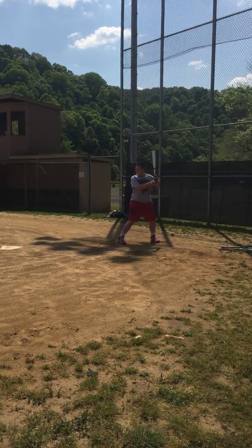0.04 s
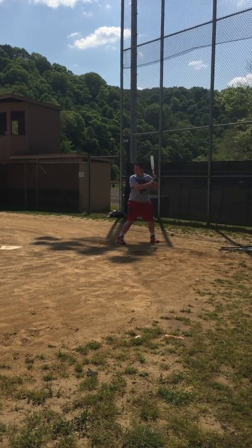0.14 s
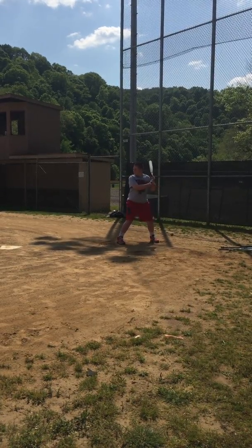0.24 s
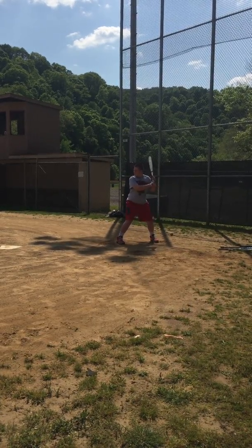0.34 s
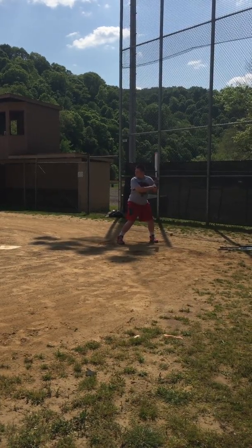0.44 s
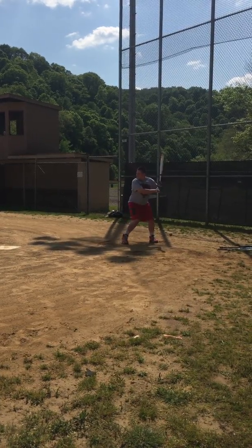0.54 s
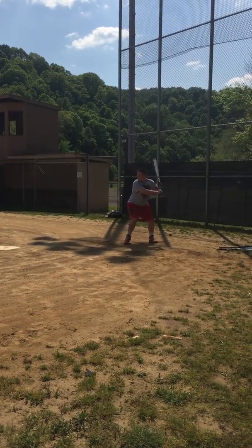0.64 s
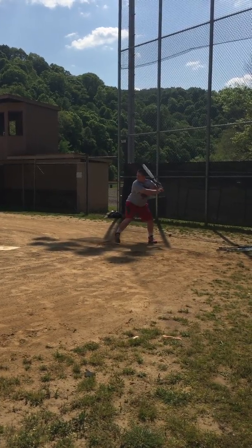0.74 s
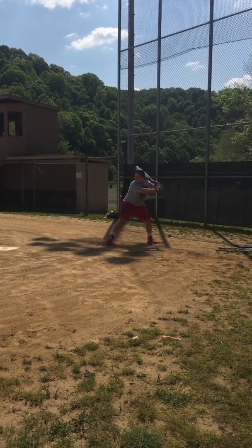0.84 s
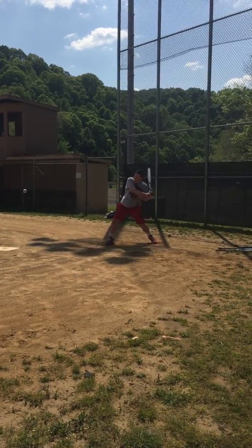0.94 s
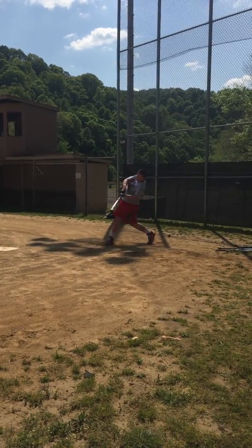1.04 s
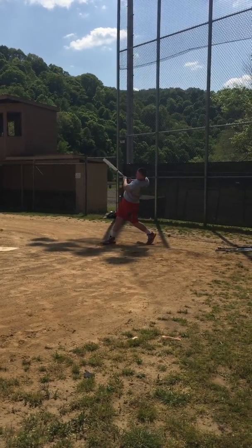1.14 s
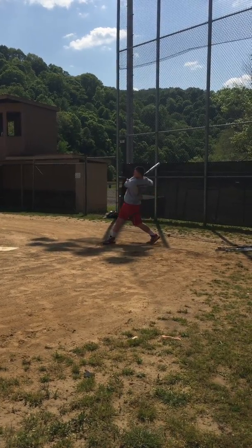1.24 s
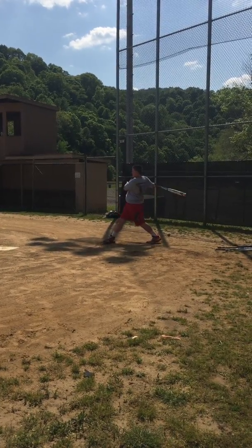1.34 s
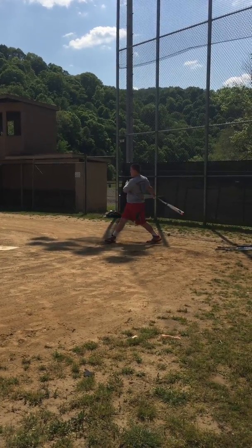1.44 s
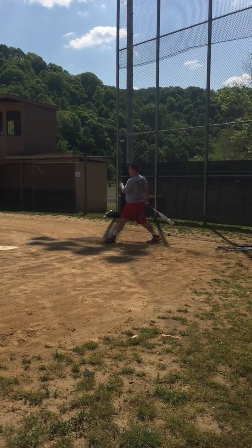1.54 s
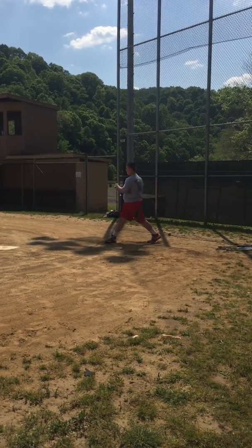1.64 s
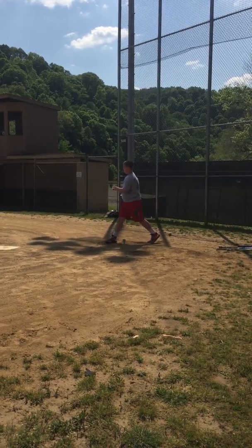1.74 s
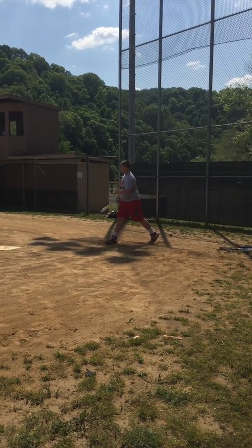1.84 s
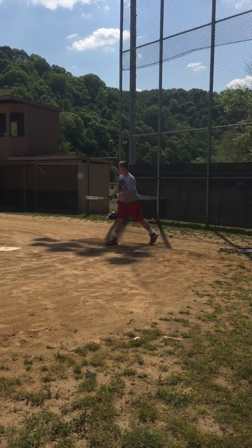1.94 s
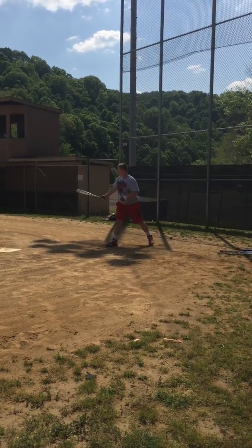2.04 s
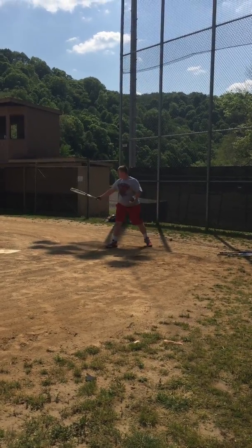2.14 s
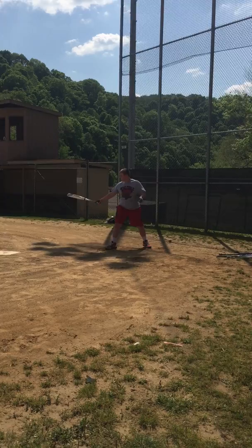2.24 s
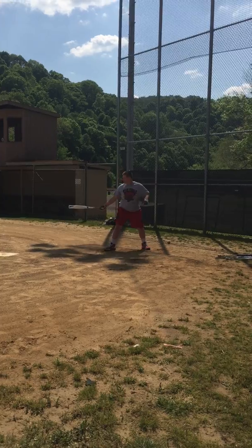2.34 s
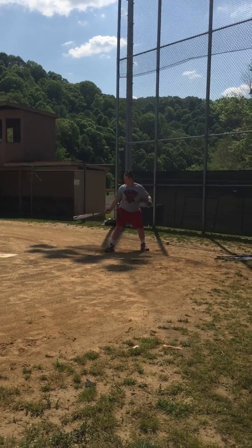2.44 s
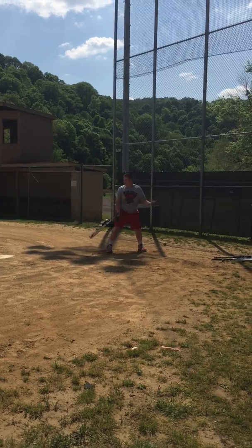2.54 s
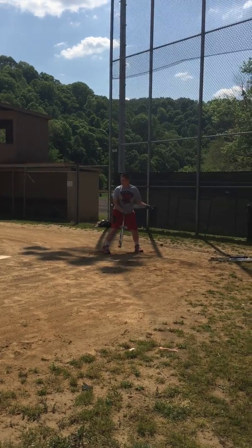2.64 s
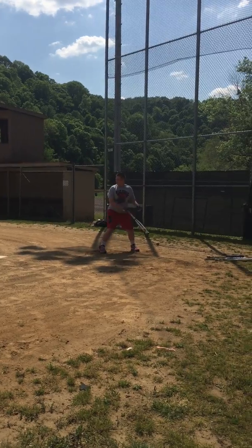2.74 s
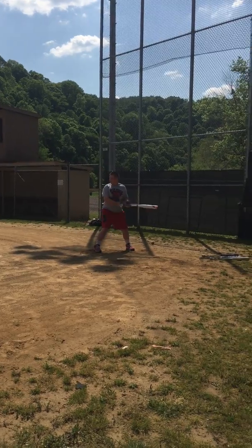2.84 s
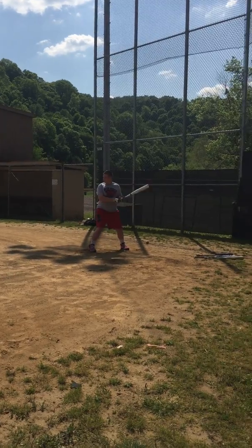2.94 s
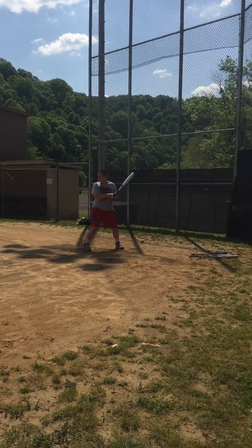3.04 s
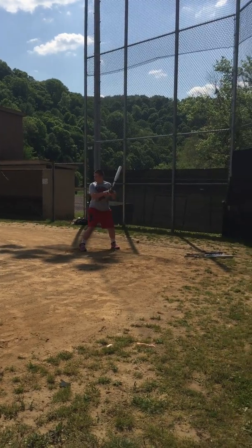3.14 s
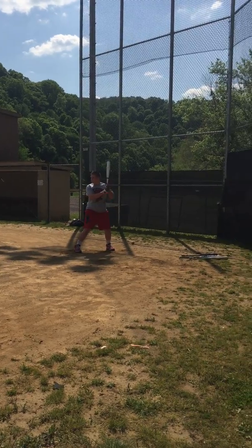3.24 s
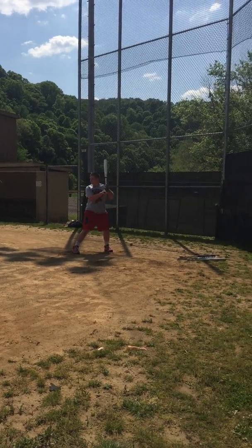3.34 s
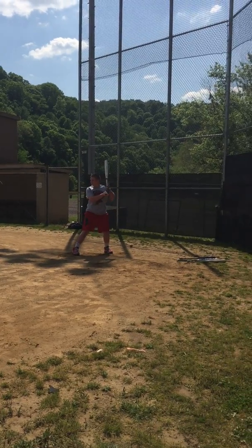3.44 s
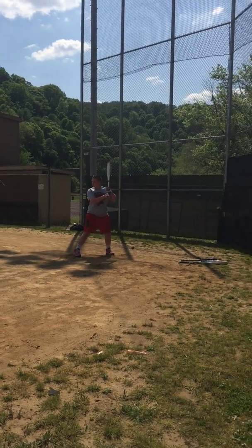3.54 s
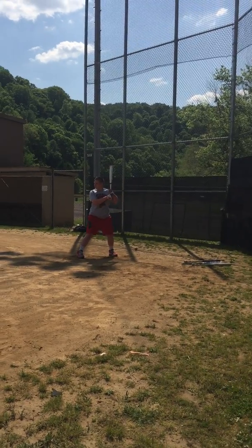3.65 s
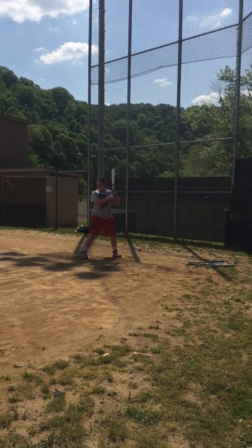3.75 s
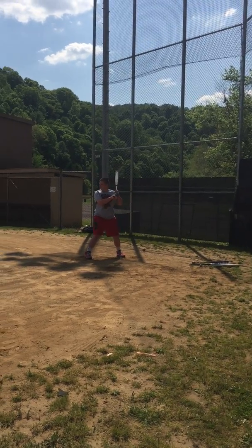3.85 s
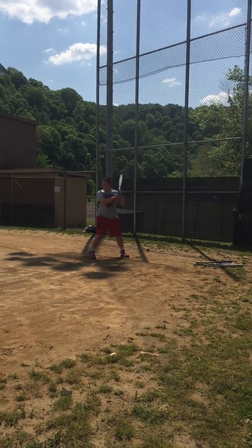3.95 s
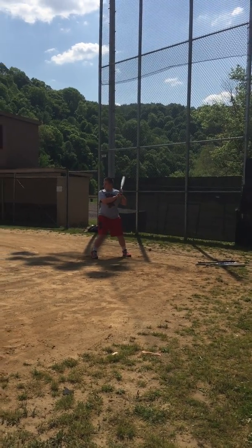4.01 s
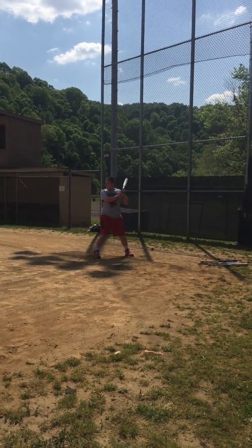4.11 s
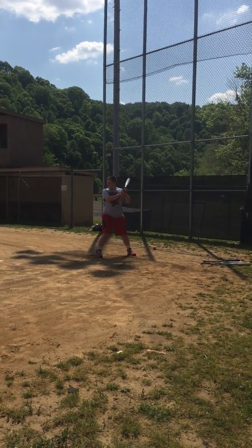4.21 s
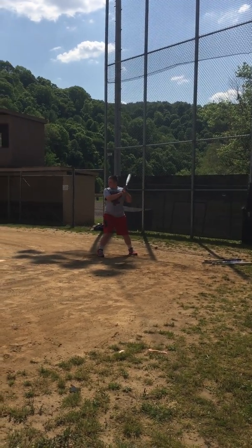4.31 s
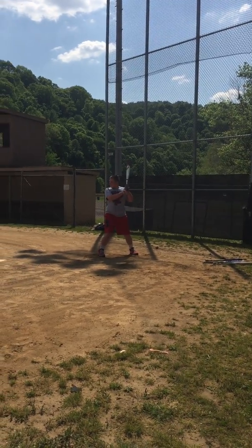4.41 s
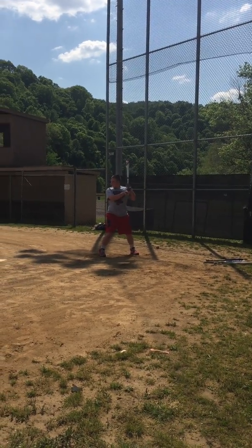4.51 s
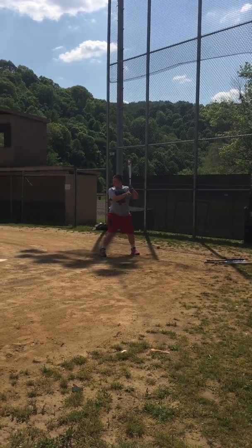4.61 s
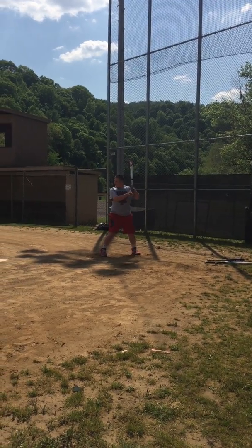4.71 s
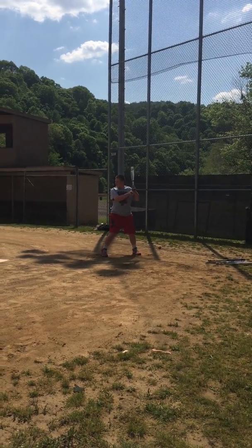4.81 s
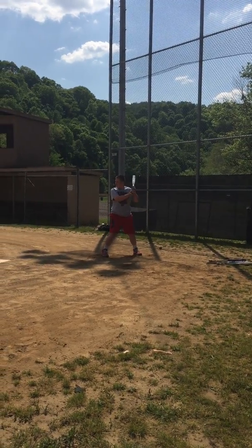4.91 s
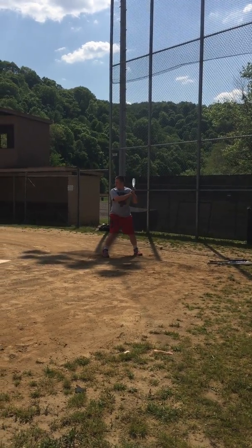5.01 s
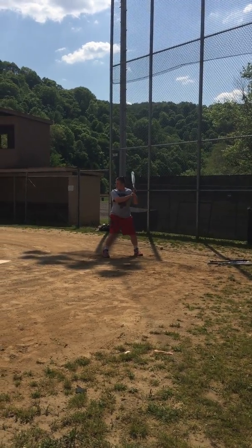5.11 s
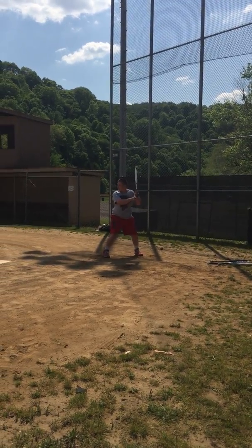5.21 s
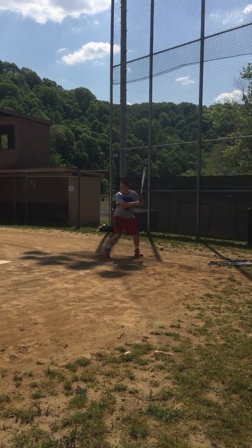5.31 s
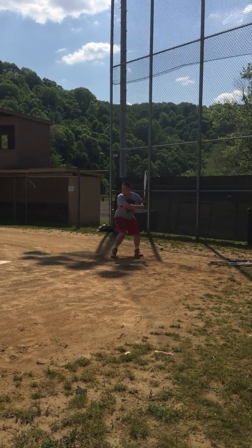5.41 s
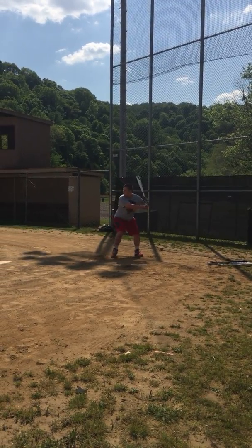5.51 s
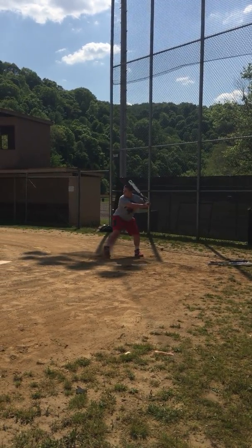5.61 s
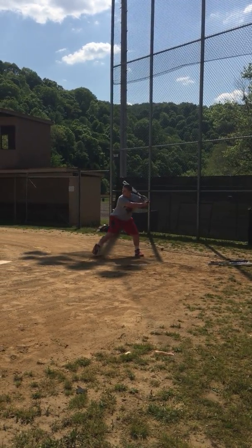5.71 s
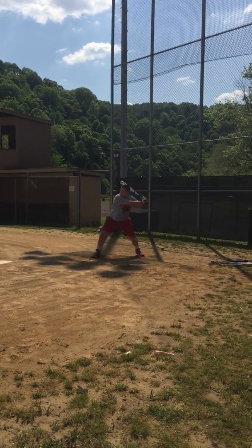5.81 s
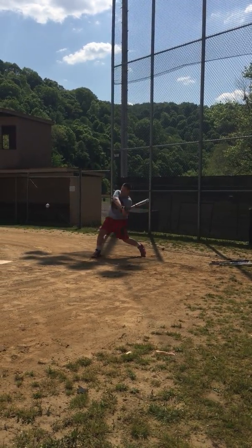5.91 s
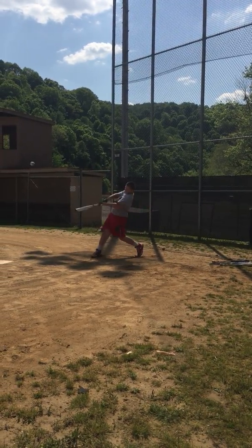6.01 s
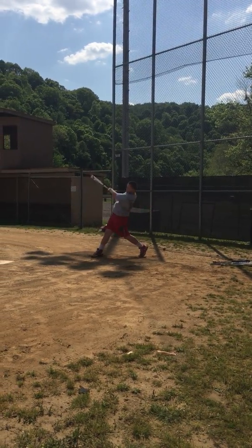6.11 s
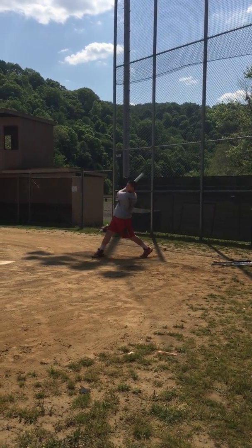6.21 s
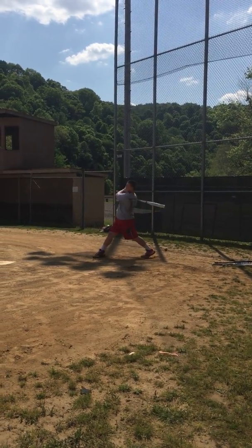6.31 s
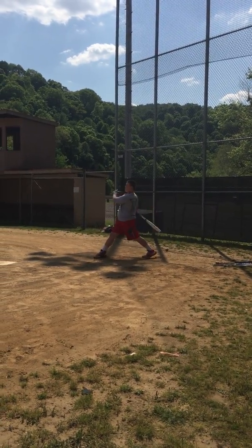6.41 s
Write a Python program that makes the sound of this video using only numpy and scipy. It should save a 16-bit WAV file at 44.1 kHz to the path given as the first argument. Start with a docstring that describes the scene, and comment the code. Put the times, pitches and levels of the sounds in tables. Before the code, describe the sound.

A metal bat hits two pitched balls. The first crack comes early, hard and hollow, with a short pinging ring and echoes from walls, fence and hillside. Between hits there are only faint bird chirps, dull little knocks and scuffs, barely audible ticking, wind bumps and a distant wash. The second crack, close to the end, is stronger and its echo is cut short.

```python
"""Metal bat on an open ball field.

A metal bat strikes two pitched balls: each crack is coloured noise, slapped back by walls, field and hill.
The barrel rings on as beating tones and fuzzy lines, bent by the swing. Dull knocks are damped resonances, scuffs
and faint hiss noise puffs, small birds gliding whistles. A faint double tick rings tiny modes. Shaped noise makes
the wind on the microphone and a distant wash; wavering sines make a far machine's hum."""
import sys
import numpy as np
from scipy import signal
from scipy.io import wavfile
from scipy.ndimage import uniform_filter1d, map_coordinates

SR = 44100
rng = np.random.default_rng(int(sys.argv[2]) if len(sys.argv) > 2 else 0)


def wrap_up_sound(samples):
    """Save the sound to the file named by the first command line argument, as 16-bit audio."""
    columns = np.atleast_2d(samples).T
    # keep every value between -1 and 1, then stretch to whole-number steps
    tamed = np.clip(columns, -1, 1)
    steps = np.round(tamed * 32767).astype(np.int16)
    wavfile.write(sys.argv[1], SR, steps)


N = 285106

# Blows. Each row: start in seconds, level in dB, low push in dB, scatter in dB.
HITS = [(1.2059, -8.5, -24, -4.5), (6.1715, -1.5, -26, -12)]
# Colour, one list per hit. Each row: frequency in Hz, relative level in dB.
CRACK_COLOURS = [
    [(88, -40.5), (150, -10.5), (589, -12.5), (1360, 0), (1790, -14.5), (2360, -8.5), (2900, -7),
     (3350, -14.5), (4160, -9), (4760, -16), (5570, -17), (6020, -32.5), (8230, -37.5), (10400, -49.5),
     (11900, -47.5), (16000, -60)],
    [(88, -62), (150, -10.5), (545, -11.5), (1260, 2.5), (1720, -3.5), (2220, 6.5), (2760, -6.5),
     (3770, -2.5), (4410, -7.5), (5250, -9), (5680, -21), (6640, -12), (8230, -28), (9260, -23.5),
     (10400, -40), (11800, -27.5), (16000, -39)],
]
# Slaps from walls and fence. Each row: delay in seconds, level in dB for hit 1, for hit 2,
# treble loss in dB per unit of log2(1 + f / 2 kHz).
SLAPS = [(0.0136, -14.5, -8.5, 1.04), (.0265, -30.5, -20, -0.5), (.038, -27, -40, 2), (0.0582, -28, -18, 4),
         (0.081, -24, -50, 3), (.092, -20, -38, 6), (0.1027, -18.5, -25.5, -1), (0.184, -36.5, -55, 1)]
# Boards and mesh lift the upper middle of the slaps: lift in dB for hit 1, for hit 2.
SLATS_DB = [10, 3.5]
# Decay of the field. Each row: frequency in Hz, t60 in seconds.
FIELD_DECAY = [(150, .3), (500, .6), (1200, .5), (2500, .55), (4000, .55), (6000, .42), (8000, .28),
               (11000, .2), (15000, .15)]
# Echo clouds from fence and tree line. Each row: delay in seconds, spread in seconds, level in dB,
# treble loss in dB per kHz.
CLOUDS = [(.1, 0.027, -13, 1.5), (0.211, 0.064, -25, 3), (.62, .1, -32, 0.5)]
# Colour of the field scatter, one list per hit. Each row: frequency in Hz, relative level in dB.
SCATTER_COLOURS = [
    [(150, -10.5), (300, -4), (600, -5), (1200, -0.5), (1800, -6.5), (2600, -4), (3500, -10), (4500, -10),
     (6000, -17), (8000, -26), (11000, -34.5), (16000, -42)],
    [(150, -6), (300, -0.5), (600, -0.5), (1300, 4), (1800, 3), (2600, -2.5), (3500, 2.5), (4500, -4.5),
     (6000, -8), (8000, -17), (11000, -28), (16000, -40)],
]
# Rms of the first 2000 samples of scatter: level in dB for hit 1, for hit 2.
FIELD_DB = [-37, -34.5]
# Short barrel overtones. Each row: frequency in Hz, level in dB for hit 1, for hit 2, t60 in seconds.
OVERTONES = [(1190, -28, -35, 0.1002), (1330, -37.5, -26.5, .11), (1600, -34.5, -25.5, 0.1382),
             (2965, -33.5, -35, 0.14), (3040, -36, -37, .25), (3560, -35, -19.5, 0.068)]


def cracks():
    """A click and a few ms of scatter take the colour of the blow; walls, field and hill send it back."""
    out, hz, t = np.zeros(N), np.fft.rfftfreq(2048, 1 / SR), np.arange(8000) / SR
    for k, (start_s, level_db, push_db, scatter_db) in enumerate(HITS):
        drive = amp(scatter_db - 60 * t[:900] / 0.025) * rng.standard_normal(900)
        drive[0] = 1
        colour = read(CRACK_COLOURS[k], hz)
        direct = np.convolve(drive, causal(colour))
        scale = amp(level_db) / (2.25 * direct[:300].std())
        add(out, start_s, scale * direct)

        slats = SLATS_DB[k] * np.exp(-(np.log2((hz + 1) / 4400) / 0.55) ** 2)
        slap_drive = drive[:130] * np.hanning(260)[130:]
        for delay_s, *slap_db, loss in SLAPS:
            duller = causal(uniform_filter1d(colour, size=70) + slats - loss * np.log2(1 + hz / 2000))
            add(out, start_s + delay_s, scale * amp(slap_db[k]) * np.convolve(slap_drive, duller))

        field = tail(lambda f, u: -60 * u / read(FIELD_DECAY, f))
        for delay_s, spread_s, db, loss in CLOUDS:  # the air dulls the cloud echoes
            cloud = tail(lambda f, u: -8.7 * ((u - delay_s) / spread_s) ** 2 - loss * f / 1000)
            field = field + amp(db) * cloud
        # few, uneven reflectors
        grain = amp(2.3 * drift(130, size=len(field)) + 3.2 * drift(500, size=len(field)))
        field = signal.fftconvolve(field * grain, causal(read(SCATTER_COLOURS[k], hz)))
        add(out, start_s + 0.004, amp(FIELD_DB[k]) * field / field[:2000].std())

        # the ball's squash pushes the air
        push_t = t[:3000]
        add(out, start_s, amp(push_db - 60 * push_t / 0.06) * np.sin(2 * np.pi * 210 * push_t))
        for f, *tone_db, t60 in OVERTONES:  # echoes make each overtone waver
            waver = 1 + 0.89 * drift(44.91, size=len(t))
            tone = waver * np.sin(2 * np.pi * f * t)
            add(out, start_s + 0.0099, amp(tone_db[k] - 60 * t / t60) * tone)
    return out


# Loud beating ring as its echoes overlap, one list per hit. Each row: time in seconds, peak in dB.
HOOP = [
    [(1.207, -40), (1.211, -20), (1.2165, -20), (1.219, -6), (1.223, -7), (1.228, -21), (1.2325, -13),
     (1.237, -22), (1.24, -19), (1.2445, -34), (1.2545, -20), (1.261, -30), (1.271, -29), (1.278, -45)],
    [(6.172, -30), (6.175, -10), (6.178, -18), (6.1815, -13), (6.184, -26), (6.1865, -10), (6.1915, -8),
     (6.196, -34), (6.1995, -34), (6.2025, -12), (6.2125, -28), (6.2155, -17), (6.2185, -34), (6.231, -13),
     (6.246, -19), (6.255, -22), (6.26, -48)],
]
# Pitch of the loud ring, bent by the swing. Each row, one per hit: start in Hz, end in Hz.
HOOP_HZ = [(2190, 2250), (2200, 2176)]
# Faint ring that the field keeps sending back, one list per hit. Each row: time in seconds, pitch in Hz,
# level in dB, partials in dB.
RING = [
    [(1.27, 2246, -36.5, -14), (1.35, 2330, -47, -14), (1.46, 2230, -50, -17), (1.52, 2253, -57.5, -8.5),
     (1.61, 2270, -59.5, -6.5), (1.7, 2215, -69.5, -11), (1.8, 2376, -56.5, -7), (1.9, 2367, -62, -9.5),
     (2.06, 2340, -67, -9.5), (2.2, 2383, -78, -14)],
    [(6.265, 2210, -36.5, -10), (6.33, 2317, -41.5, -15), (6.375, 2180, -49.5, -11),
     (6.44, 2236, -41, -19.5), (6.464, 2130, -48.5, -14)],
]
# Each row: ratio to the ring's pitch, level in dB, width in Hz.
RING_PARTIALS = [(.54, -3, 130), (1.275, -2, 90), (1.88, -14, 90)]
# Whistle of the swing. One row: start in seconds, length in seconds, start in Hz, end in Hz, level in dB.
SWISH = (1.0, .2, 2250, 2800, -72)


def barrel():
    """Hoop mode: a loud beating tone, then a fuzzy line and its partials bent by the swing; plus the swish."""
    out = np.zeros(N)
    for rows, hz in zip(HOOP, HOOP_HZ):
        s, peak_db = np.transpose(rows)
        u = np.arange(s[0], s[-1], 1 / SR)
        strength = uniform_filter1d(np.interp(u, s, amp(peak_db)), size=70)
        bent_hz = np.linspace(*hz, len(u)) * (1 + 0.007 * drift(70, size=len(u)))
        ends = np.minimum(1, np.minimum(u - s[0], s[-1] - u) / 0.002)
        add(out, s[0], ends * strength * np.sin(2 * np.pi * np.cumsum(bent_hz) / SR))

    for rows in RING:
        s, hz, level_db, partials_db = np.transpose(rows)
        u = np.arange(s[0], s[-1], 1 / SR)
        hz = np.interp(u, s, hz)
        line = evened(resonate(resonate(rng.standard_normal(len(u)), hz, 130), hz, 190))
        for ratio, db, width_hz in RING_PARTIALS:
            fuzz = fuzzy(len(u), ratio * hz, width_hz)
            partial_db = db + np.interp(u, s, partials_db) + 4.5 * drift(14.03, size=len(u))
            line = line + amp(partial_db) * fuzz
        fade_in = np.minimum(1, (u - s[0]) / 0.014)
        add(out, s[0], amp(np.interp(u, s, level_db)) * line * fade_in)

    start_s, length_s, start_hz, end_hz, db = SWISH
    add(out, start_s, amp(db) * wisp(length_s, start_hz, end_hz, width_hz=95, clear=0.45))
    return out


# Dull knocks: the hollow thock of the blows, its slap-backs, and a few stray thumps.
# Each row: start in seconds, level in dB, frequency in Hz, t60 in seconds.
KNOCKS = [(1.2068, -8.5, 1280, 0.023), (1.297, -23, 262, 0.056), (1.3084, -30, 1252, 0.052),
          (1.388, -36.5, 600, 0.017), (2.039, -50, 300, 0.072), (3.55, -61, 570, 0.1),
          (5.971, -41, 200, 0.045), (6.2756, -19.5, 1416, 0.019)]
# Soft noise puffs: short scuffs, and long faint swells of hiss near 2 kHz.
# Each row: start in seconds, length in seconds, centre in Hz, width in Hz, level in dB.
PUFFS = [(0.468, 0.38, 1920, 500, -72.5), (0.682, 0.065, 1430, 303, -68), (0.984, .087, 830, 398, -69),
         (2.026, .05, 2500, 3000, -69.5), (2.651, .2, 2100, 600, -75), (3.35, .061, 1880, 1510, -70),
         (4.102, .64, 1850, 499, -75.5), (5.554, 0.077, 1355, 350, -64), (5.56, 0.056, 3720, 1784, -69),
         (5.921, 0.15, 2060, 449, -69)]


def knocks_and_puffs():
    """Knocks decay as a sine plus noise in one broad resonance; puffs are softly faded band noise."""
    out, t = np.zeros(N), np.arange(6000) / SR
    attack = np.sin(np.pi / 2 * np.minimum(1, t / 0.0011)) ** 2
    for start_s, level_db, hz, t60 in KNOCKS:
        body = np.sin(2 * np.pi * hz * t) + 0.5 * fuzzy(len(t), hz, 0.7 * hz)
        add(out, start_s, amp(level_db - 60 * t / t60) * attack * body)
    for start_s, length_s, hz, width_hz, db in PUFFS:
        puff = wisp(length_s, hz, hz, width_hz, clear=0)
        add(out, start_s, amp(db + 3.0 * drift(40.7, size=len(puff))) * puff)
    return out


# Two-part chirps. Each row: start in seconds, top in Hz, level in dB, wait in seconds, rise length in seconds,
# rise from in Hz, rise to in Hz, rise level in dB, hillside share in dB.
CHIRPS = [(0.351, 5960, -56.5, .093, 0.069, 4120, 5330, -54.5, -15),
          (2.287, 6050, -54.5, .078, .07, 3690, 5540, -53.5, -21),
          (2.688, 5600, -47, 0.09, 0.087, 3950, 4630, -55.5, -25.5),
          (3.882, 5650, -53, 0.098, 0.04, 3735, 4080, -61, -9)]
# Single chips. Each row: start in seconds, length in seconds, start in Hz, end in Hz, level in dB.
CHIPS = [(0.089, 0.027, 3350, 3380, -63.5), (1.706, 0.038, 3650, 3400, -67), (2.33, 0.041, 2618, 2716, -62),
         (2.958, 0.037, 4480, 4460, -69), (3.005, .03, 3490, 3400, -64.5), (3.079, 0.047, 4200, 4360, -71),
         (3.154, 0.044, 2970, 4190, -67), (3.52, 0.041, 4740, 3790, -67), (3.593, .022, 3840, 3860, -57),
         (3.975, 0.081, 4460, 4730, -59), (4.066, 0.015, 3900, 3900, -63.5),
         (4.097, 0.025, 3570, 4170, -66), (4.886, .03, 3340, 3530, -56.5), (5.964, .036, 3824, 3360, -63),
         (6.007, 0.03, 3240, 3410, -65)]
CHIP_HILL_DB = -14
LEAD_S, LEAD_FROM_RATIO, LEAD_DB = 0.0266, 0.92, -57.5  # soft lift up to the top note
FALL_AT_S, FALL_S, FALL_TO_RATIO = 0.018, 0.034, 0.86  # loud drop from the top
LINK_S, LINK_HZ, LINK_REL_DB, LINK_AHEAD_S = 0.0359, (5300, 4900), -4.5, 0.013  # short dip ahead of the rise


def birds():
    """Gliding, broken whistles, smeared by trees and answered by the hillside."""
    notes = [(*chip, CHIP_HILL_DB) for chip in CHIPS]
    for s, top_hz, db, wait_s, rise_s, from_hz, to_hz, rise_db, hill_db in CHIRPS:
        rise_at_s = s + wait_s
        notes += [(s, LEAD_S, LEAD_FROM_RATIO * top_hz, top_hz, LEAD_DB, hill_db),
                  (s + FALL_AT_S, FALL_S, top_hz, FALL_TO_RATIO * top_hz, db, hill_db),
                  (rise_at_s - LINK_AHEAD_S, LINK_S, *LINK_HZ, rise_db + LINK_REL_DB, hill_db),
                  (rise_at_s, rise_s, from_hz, to_hz, rise_db, hill_db)]
    dry, far = np.zeros(N), np.zeros(N)
    for s, length_s, start_hz, end_hz, level_db, hill_db in notes:
        note = wisp(length_s, start_hz, end_hz, width_hz=200, clear=0.5)
        note = amp(level_db + 3.3 * drift(90, size=len(note))) * note
        add(dry, s, note)
        add(far, s, amp(hill_db) * note)
    # leaves scatter the high notes most
    trees = tail(lambda f, u: -60 * u / 0.4 - 9 * (f < 3900))
    slope = tail(lambda f, u: -8.7 * ((u - 0.36) / 0.17) ** 2 - 15 * (f < 4300))
    smeared = signal.fftconvolve(dry, trees)[:N]
    answered = signal.fftconvolve(far, slope)[:N]
    return amp(-3.0) * dry + amp(-5.0) * smeared + amp(-4.0) * answered


# Each row: frequency in Hz, relative level in dB, t60 in seconds.
TICK_MODES = [(5400, -8, .003), (6400, -5.5, .003), (7500, -3, 0.0029), (8500, 0, .004),
              (9500, -3.5, 0.0049)]
# Ticks off the beat: time in seconds.
STRAY_TICKS_S = [1.0, 1.675, 2.2795, 2.6777, 3.5597, 4.6845, 5.6878]
TICK_FIRST_S, TICK_EVERY_S = 0.0297, 0.30001
TICK_DB, SECOND_REL_DB, TICK_SPREAD_DB = -48.5, -8.5, 0.36
TICK_LOSS_DB_PER_S = 44.5  # a tick that comes early is weaker


def ticks():
    """Two tiny strokes 4.2 ms apart ring the same small modes, on a steady beat with a few strays."""
    out, t = np.zeros(N), np.arange(400) / SR
    stroke = np.zeros(len(t))
    for k, (hz, db, t60) in enumerate(TICK_MODES):
        stroke += (-1) ** k * amp(db - 60 * t / t60) * np.sin(2 * np.pi * hz * t)
    stroke = stroke * np.sin(np.pi / 2 * np.minimum(1, t / 0.0003)) ** 2
    stroke = stroke / abs(stroke).max()
    times_s = np.sort(np.append(np.arange(TICK_FIRST_S, N / SR, TICK_EVERY_S), STRAY_TICKS_S))
    early_s = TICK_EVERY_S - np.diff(times_s, prepend=times_s[0] - TICK_EVERY_S)
    levels_db = TICK_DB - TICK_LOSS_DB_PER_S * early_s
    chance_db = TICK_SPREAD_DB * rng.standard_normal((len(times_s), 2))
    for s, db, (first_db, later_db) in zip(times_s, levels_db, chance_db):
        add(out, s + 0.0025, amp(db + first_db) * stroke)
        add(out, s + 0.0067, amp(db + SECOND_REL_DB + 2 * later_db) * stroke)
    return out


# Each row: frequency in Hz, relative level in dB.
WIND_COLOUR = [(12, -42), (20, -18), (54, 11), (108, 3), (200, -13.5), (242, -22), (329, -27.5),
               (362, -30.5), (500, -56.5), (650, -82.5), (1100, -120)]
# Wind between gusts. Each row: time in seconds, level in dB.
LULL = [(0, -52), (.5, -58), (1.1, -53.5), (2.3, -62.5), (3, -55), (4, -79), (5.4, -58.5), (6.46, -58)]
# Gusts and low puffs on the microphone, two of them just before the blows.
# Each row: centre in seconds, length in seconds, peak level in dB.
GUSTS_AND_LOW_PUFFS = [(0.03, 0.3, -45.5), (0.357, 0.5, -50.5), (0.692, 0.31, -34.5), (1.194, 0.067, -44),
                       (1.325, .08, -60), (1.436, .1, -52.5), (1.643, 0.029, -42), (1.731, 0.058, -47),
                       (1.93, 0.21, -51), (2.572, .11, -48), (2.722, 0.087, -43), (2.916, .25, -51),
                       (4.236, .12, -54.5), (5.92, 0.057, -50.5), (6.159, 0.066, -38.5)]
LUMPS_DB, LUMPS_HZ = 2, 9


def wind():
    """Low noise on the microphone: a lumpy lull with rounded gusts and low puffs on top."""
    t = np.arange(N) / SR
    force = amp(np.interp(t, *np.transpose(LULL)) + LUMPS_DB * drift(LUMPS_HZ, size=N))
    for centre_s, length_s, db in GUSTS_AND_LOW_PUFFS:
        phase = np.clip((t - centre_s) / length_s, -0.5, 0.5)
        force = force + amp(db) * np.cos(np.pi * phase) ** 2
    return force * noise(WIND_COLOUR, patchy_db=1.5)


# Distant wash. Each row: frequency in Hz, relative level in dB.
AIR_COLOUR = [(250, -30.5), (420, -6.5), (505, -4), (813, -0.5), (1270, -9), (1390, -4.5), (1670, -8.5),
              (1980, -4.5), (2780, -13.5), (4270, -11), (7200, -21), (8390, -21), (10600, -26),
              (15300, -26), (16500, -39.5)]
# Each row: time in seconds, level in dB.
AIR_LEVEL = [(0, -70), (1.05, -68), (1.6, -67.5), (3, -69), (4.2, -68.5), (5, -69), (5.6, -68.5),
             (6.46, -65)]
# Each row: frequency in Hz, relative level in dB.
RUMBLE_COLOUR = [(24, -36.5), (40, -9), (91, -2.5), (155, -5.5), (205, 1.5), (266, -2), (319, -6.5),
                 (364, -10.5), (440, -26.5), (570, -49.5), (970, -120)]
# Multiples of the hum, from 1 up. Each row: level in dB, swell centre in seconds, swell spread in seconds,
# swell height in dB.
HUM = [(-64, 5.14, 0.2, 8), (-67.5, 5.38, 0.86, 10.5), (-70.5, 4.6, 1.1, 9.5), (-69, 5.2, 0.38, 6.5)]
RUMBLE_DB, HUM_HZ, DRONE_HZ, DRONE_DB = -60, 90.8, 126, -64


def background():
    """Distant wash and rumble as noise; a wavering harmonic hum and a drone beside it as sines."""
    t = np.arange(N) / SR
    air = amp(np.interp(t, *np.transpose(AIR_LEVEL))) * noise(AIR_COLOUR, patchy_db=0.96)
    rumble = amp(RUMBLE_DB) * noise(RUMBLE_COLOUR, patchy_db=2.0)
    cycles = np.cumsum(HUM_HZ * (1 + 0.004 * drift(2.0, size=N))) / SR  # the engine speed wanders
    hum = np.zeros(N)
    for k, (db, centre_s, spread_s, swell_db) in enumerate(HUM):
        swell = swell_db * np.exp(-((t - centre_s) / spread_s) ** 2)
        waver = 4 * drift(2.5, size=N) + 2.5 * drift(9, size=N)
        hum += amp(db + swell + waver) * np.sin(2 * np.pi * (k + 1) * cycles)
    drone = amp(DRONE_DB + 3.0 * drift(4, size=N)) * np.sin(2 * np.pi * DRONE_HZ * t)
    return air + rumble + hum + drone


def wisp(length_s, start_hz, end_hz, width_hz, clear):
    """A gliding whistle: a share of pure tone, the rest noise in a narrow moving band, faded at both ends."""
    size = round(length_s * SR)
    u = np.linspace(0, 1, size)
    glide = np.sin(np.pi / 2 * u) ** 2  # dwells at both ends
    hz = (start_hz + (end_hz - start_hz) * glide) * (1 + 0.012 * drift(59.83, size=size))
    fuzz = fuzzy(size, hz, width_hz)
    tone = np.sqrt(2) * np.sin(2 * np.pi * np.cumsum(hz) / SR)
    return (clear * tone + (1 - clear) * fuzz) * np.sin(np.pi * u ** 0.85) ** 0.78


def fuzzy(size, hz, width_hz):
    """Noise through two equal resonances, rms 1."""
    return evened(resonate(resonate(rng.standard_normal(size), hz, width_hz), hz, width_hz))


def resonate(x, hz, width_hz):
    """A resonance of gain 1 that follows the curve hz: shift to 0 Hz, one-pole lowpass, shift back."""
    turn = np.exp(2j * np.pi * np.cumsum(hz * np.ones(len(x))) / SR)
    r = np.exp(-np.pi * width_hz / SR)
    return 2 * (turn * signal.lfilter([1 - r], [1, -r], x / turn)).real


def noise(colour, patchy_db):
    """Coloured noise with patches over time and frequency, rms 1."""
    frames, hz = N // 256 + 5, np.fft.rfftfreq(1024, 1 / SR)
    a, b, patches = rng.standard_normal((frames, 513, 3)).T
    patches = evened(uniform_filter1d(uniform_filter1d(patches, size=10, axis=0), size=14, axis=1))
    z = (a + 1j * b) * amp(read(colour, hz)[:, None] + patchy_db * patches)
    return evened(signal.istft(z, nperseg=1024, noverlap=768)[1][:N])


def tail(level_db):
    """Sparse taps of random sign, shaped by a level over frequency and time, energy 1."""
    taps = np.zeros(SR)
    at = np.arange(0, SR - 12, 12) + rng.integers(0, 12, (SR - 1) // 12)
    taps[at] = rng.choice([-1., 1.], len(at))
    hz, t, z = signal.stft(taps, SR, nperseg=128)
    out = signal.istft(z * amp(level_db(hz[:, None], t)), SR, nperseg=128)[1]
    return out / np.linalg.norm(out)


def causal(gain_db):
    """Minimum-phase response for a gain given on 1025 bins, floored 90 dB below its top."""
    log_gain = np.log(amp(np.maximum(gain_db, gain_db.max() - 90)))
    full = np.concatenate([log_gain, log_gain[-2:0:-1]])
    return np.fft.ifft(np.exp(np.conj(signal.hilbert(full)))).real[:1024]


def drift(top_hz, size):
    """Smooth random curve through normal points, 2 * top_hz of them per second."""
    points = rng.standard_normal(int(size / SR * 2 * top_hz) + 4)
    return map_coordinates(points, [np.arange(size) / SR * 2 * top_hz], order=3)


def read(points, hz):
    """Reads a spectrum on a log-frequency axis."""
    f, value = np.transpose(points)
    return np.interp(np.log(hz + 1), np.log(f + 1), value)


def amp(db):
    """Gain of a level in dB."""
    return 10 ** (np.asarray(db) / 20)


def evened(x):
    """Scales to rms 1."""
    return x / np.sqrt(np.mean(x ** 2) + 1e-20)


def add(mix, start_s, sound):
    """Mixes a sound in at start_s."""
    part = mix[max(round(start_s * SR), 0):][:len(sound)]
    part += sound[:len(part)]


def scene():
    """All sources on one channel."""
    return (cracks() + barrel() + knocks_and_puffs() + birds() + ticks() + wind() + background())[None]


def record(dry):
    """A small microphone cuts the deepest bass, loud peaks round off, then the band limit."""
    cut = signal.sosfilt(signal.butter(4, 40, "high", fs=SR, output="sos"), dry)
    rounded = 0.8 * np.tanh(cut / 0.8)
    band_limit = signal.firwin(511, 15900, window=("kaiser", 9), fs=SR)
    return signal.oaconvolve(rounded, band_limit[None], "same")


dry = scene()
out = record(dry)
wrap_up_sound(out)
```